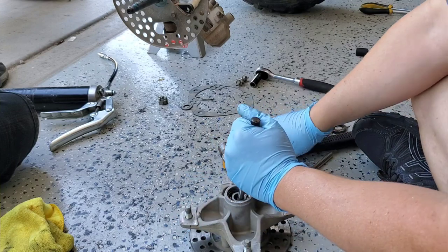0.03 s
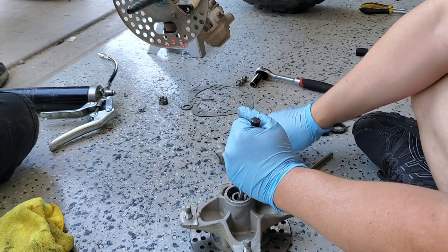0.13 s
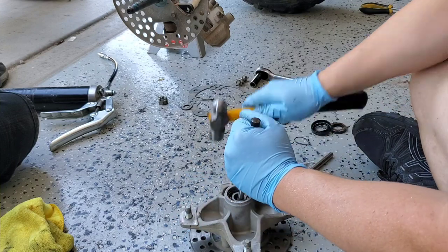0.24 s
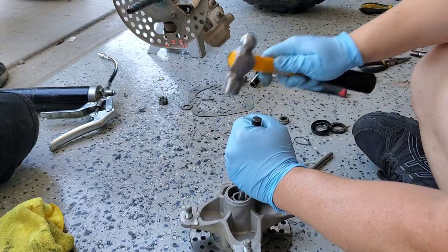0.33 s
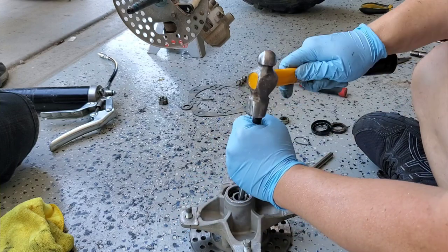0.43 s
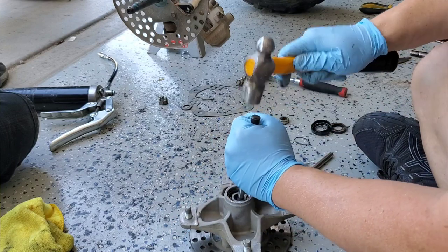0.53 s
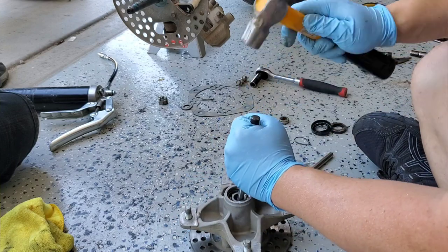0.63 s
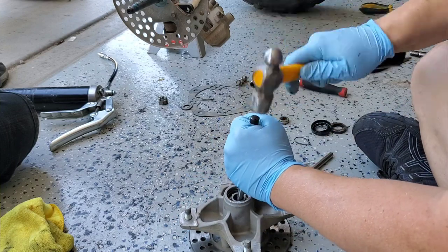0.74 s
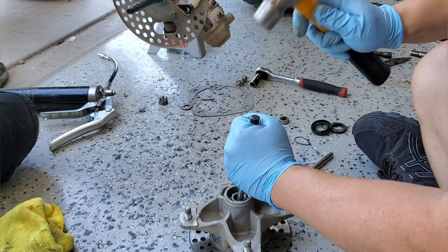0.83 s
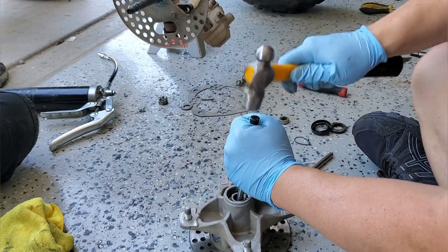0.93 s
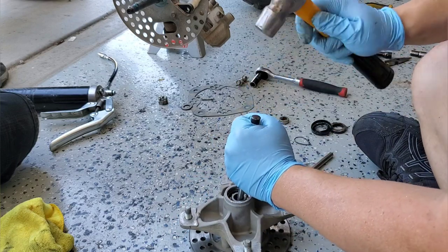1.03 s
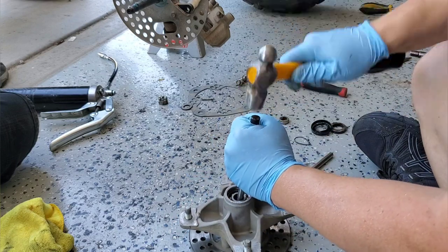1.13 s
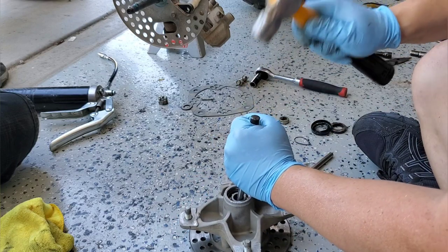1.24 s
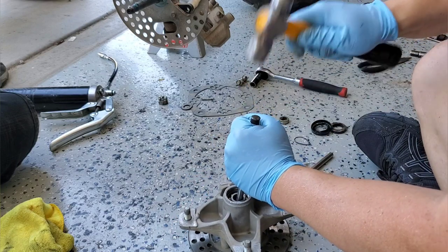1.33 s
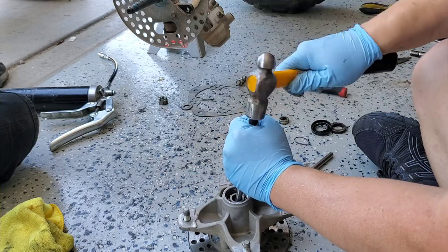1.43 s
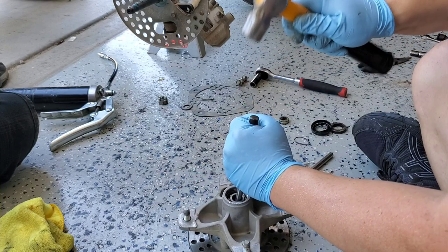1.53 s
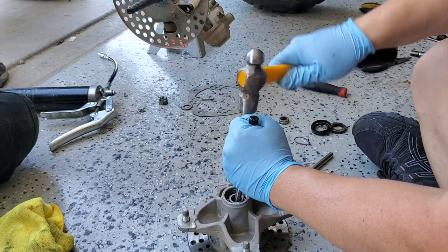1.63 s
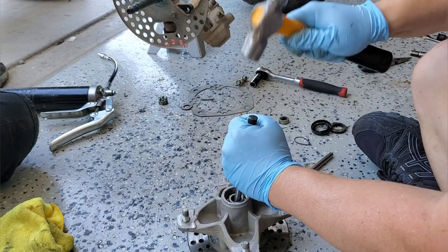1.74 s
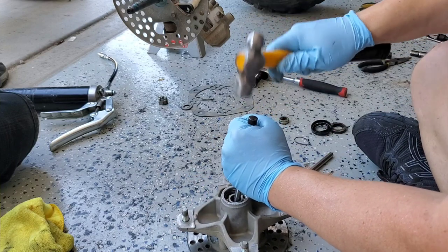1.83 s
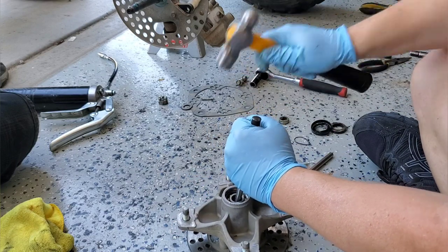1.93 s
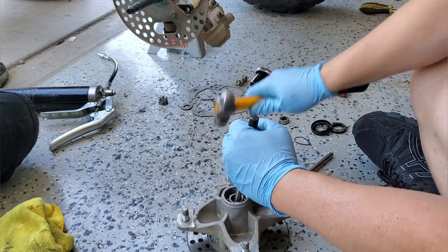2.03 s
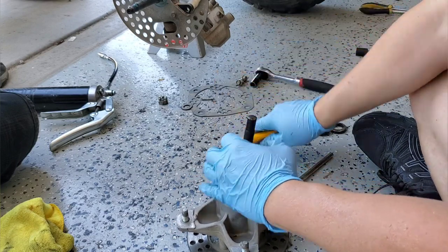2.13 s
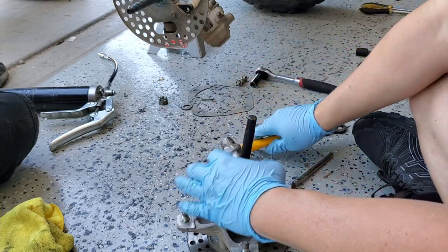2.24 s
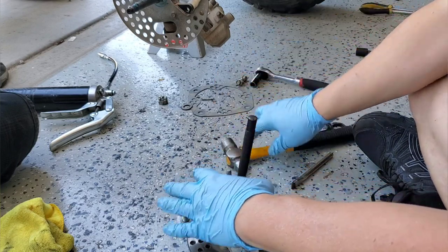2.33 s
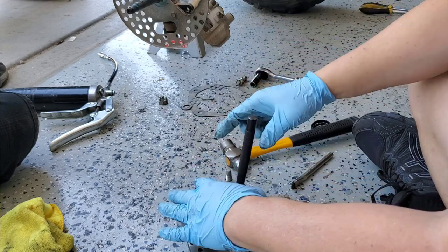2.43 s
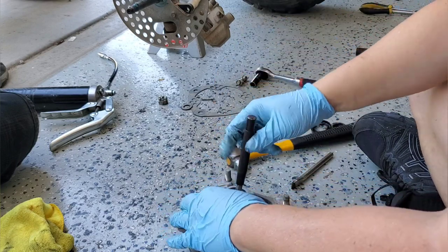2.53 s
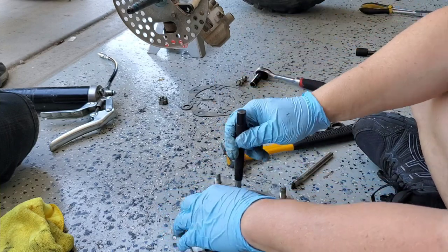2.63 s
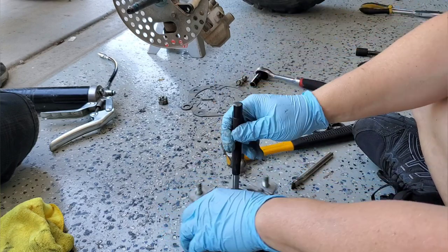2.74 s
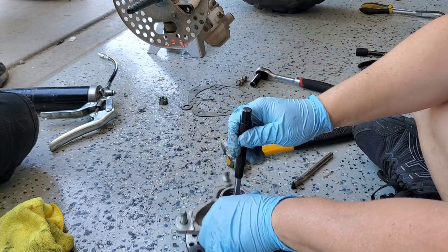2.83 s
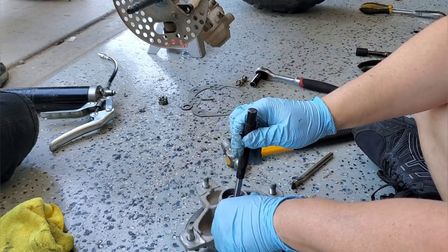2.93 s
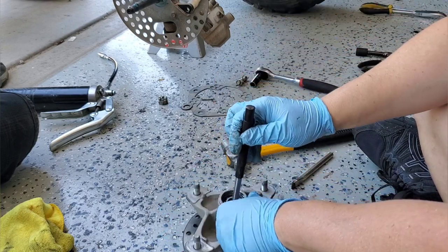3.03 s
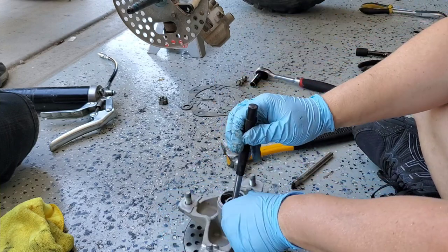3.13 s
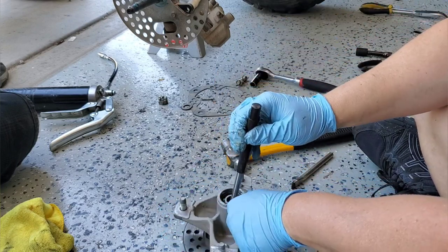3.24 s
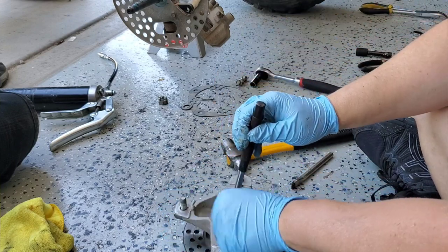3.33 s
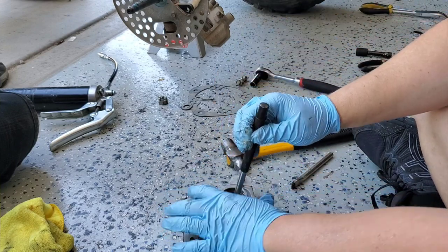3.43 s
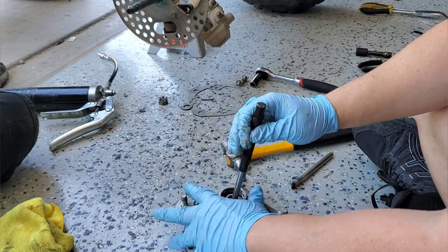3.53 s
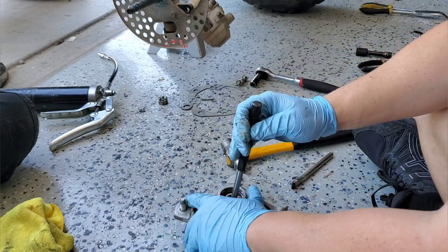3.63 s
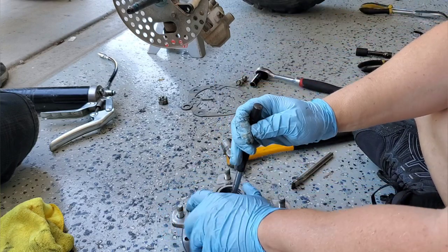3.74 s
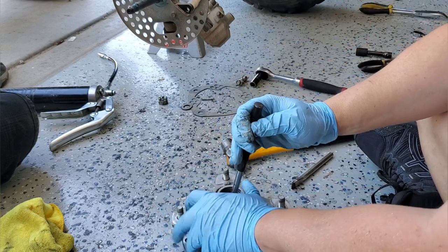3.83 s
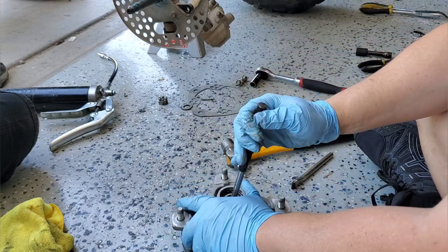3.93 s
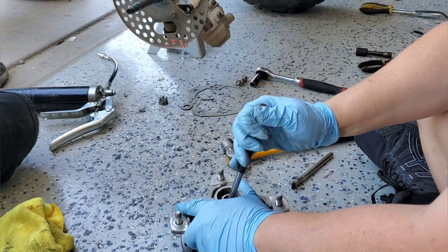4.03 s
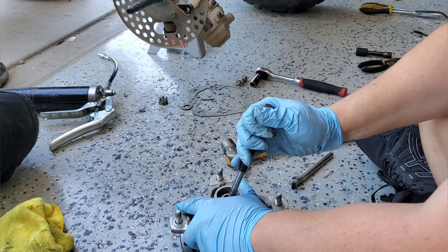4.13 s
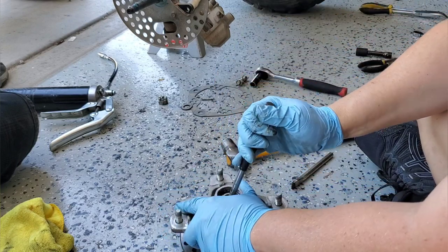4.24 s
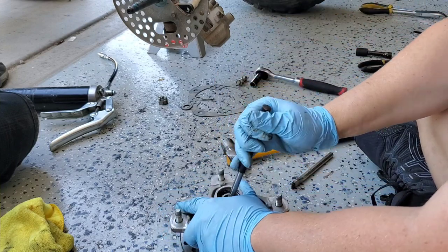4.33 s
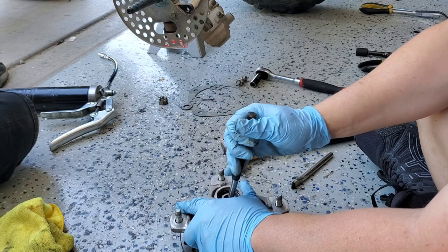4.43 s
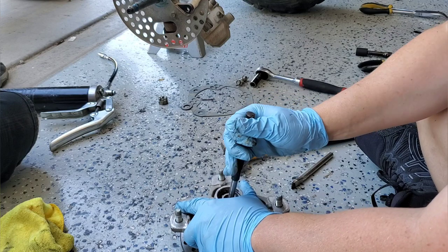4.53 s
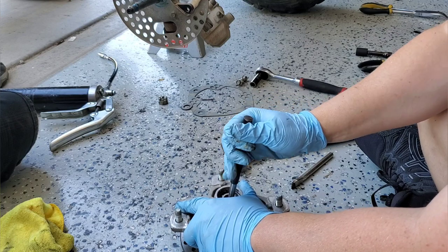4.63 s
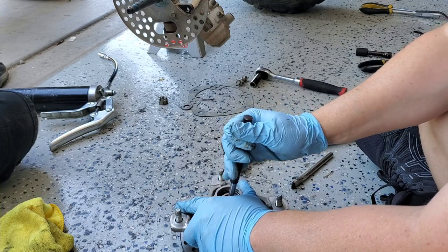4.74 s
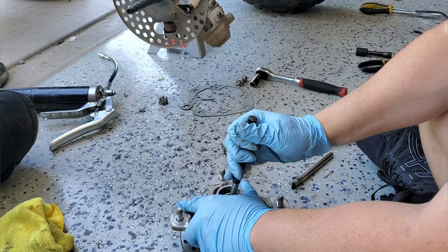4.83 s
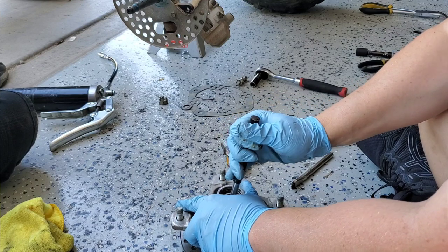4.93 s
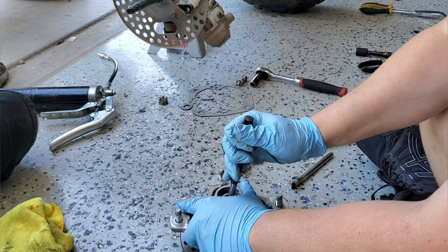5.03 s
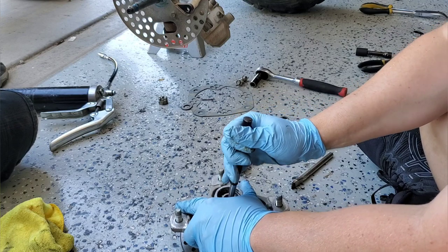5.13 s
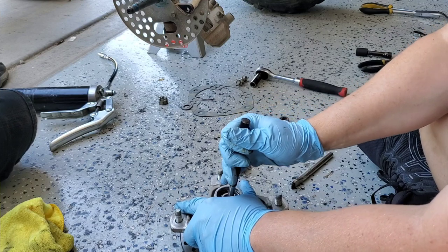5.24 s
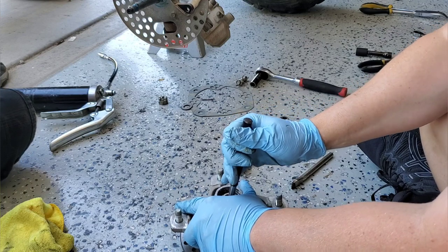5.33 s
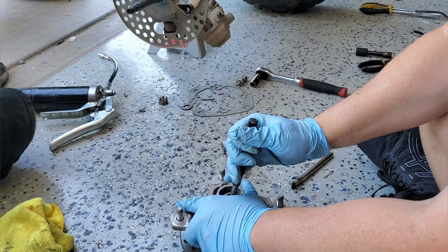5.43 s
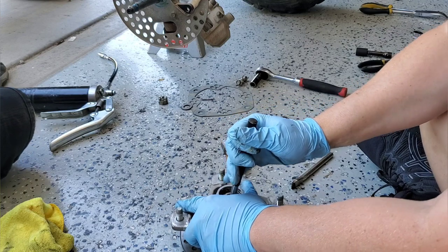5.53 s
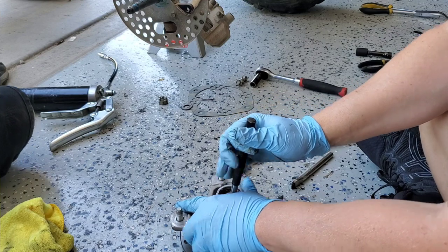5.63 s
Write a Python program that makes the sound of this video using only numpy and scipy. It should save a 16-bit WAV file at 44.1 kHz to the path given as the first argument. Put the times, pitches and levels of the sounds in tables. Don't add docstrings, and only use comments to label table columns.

```python
import sys
import numpy as np
from scipy import signal
from scipy.fft import rfft, irfft, next_fast_len
from scipy.io import wavfile
from scipy.ndimage import uniform_filter1d

SR = 44100
rng = np.random.default_rng(int(sys.argv[2]) if len(sys.argv) > 2 else 0)


def magnitude_from_level(level_db):
    exponent = np.asarray(level_db, float) / 20
    return 10 ** exponent


def wrap_up_sound(samples):
    columns = np.atleast_2d(samples).T
    tamed = np.clip(columns, -1, 1)
    steps = np.round(tamed * 32767).astype(np.int16)
    wavfile.write(sys.argv[1], SR, steps)


N = 251370

# [t/s, clank level/dB, hammer head ring/dB, hub middle ring/dB, hub high ring/dB]
BLOWS = [(0.5001, -12, -28, -27, -32), (0.7326, -4, -26.5, -20, -26.5), (0.9284, -8.5, -32, -29, -25.5),
         (1.1097, -12.5, -25.5, -29, -21.5), (1.2896, -9.5, -29, -29.5, -24.5), (1.4657, -9, -28, -32, -24),
         (1.644, -11.5, -20.5, -33.5, -26.5), (1.825, -10, -33, -32.5, -27)]
# [t/s, contact level/dB, low ring/dB, middle ring/dB, high ring/dB]
TOUCHES = [
    (2.715, -38, -49, -67, -67),
    (2.891, -43.5, -72, -63, -82),
    (3.092, -65, -48, -60.5, -72),
    (3.236, -47, -56, -59, -76),
    (3.975, -50, -74.5, -76, -63),
    (4.071, -8.5, -40.5, -41, -50),
    (4.4, -46, -70, -50.5, -71),
    (4.440, -33, -69, -56.5, -59.5),
    (5.196, -14.5, -59, -61.5, -45),
]
# [t/s, level/dB]
FINAL_KNOCK = [(5.1965, 3)]
# [f/Hz, width/Hz, level/dB]
GRATING_BODY = [(1144, 90, 4), (1750, 970, -2), (2907, 220, -7.5), (3842, 250, -5), (4480, 320, -7.5),
                (5920, 1400, -4), (8100, 860, -8), (11900, 2000, -10)]


def at_hz(points, hz):
    points_hz, values = np.transpose(points)
    return np.interp(np.log(hz), np.log(points_hz), values)


def rms_one(x):
    return x / np.sqrt(np.mean(x ** 2) + 1e-20)


def drift(rate):
    points = rng.standard_normal(400)
    return np.interp(np.arange(N) / SR * rate, np.arange(len(points)), points)


def stereo_band(white, low, high, likeness):
    band = signal.butter(2, [low, high], "band", fs=SR, output="sos")
    mid, side = signal.sosfilt(band, white)
    alike = np.clip(at_hz(likeness, np.sqrt(low * high)), 0, 1)
    return np.sqrt(1 + alike) * mid + np.sqrt(1 - alike) * side * [[1], [-1]]


def banded_noise(spectrum, low_hz, patchy_db, rate):
    # [f/Hz, likeness]
    likeness = [(60, .92), (240, 0.88), (950, 0.69), (3770, 0.16), (15000, 0.058)]
    out, together = 0, drift(rate)
    white = rng.standard_normal((2, 2, N))
    edges = low_hz * 2 ** np.arange(0, 6.1, .5)
    for k, (low, high) in enumerate(zip(edges, edges[1:])):
        flicker = patchy_db * (together + 0.57 * drift(rate))
        gain = magnitude_from_level(at_hz(spectrum, np.sqrt(low * high)) + flicker)
        out = out + gain * stereo_band(white[k % 2], low, high, likeness)
    return rms_one(out)


def strokes(rows, rise_db_s, fall_db_s):
    t = np.arange(0, N + 64, 32) / SR
    s, length, db = np.transpose(rows)[:, :, None]
    rise = rise_db_s * np.maximum(s - t, 0)
    fall = fall_db_s * np.maximum(t - s - length, 0)
    return np.interp(np.arange(N) / SR, t, magnitude_from_level(db - rise - fall).sum(axis=0))


def body(force, resonances):
    out = 0
    for k, (hz, width, db) in enumerate(resonances):
        r = np.exp(-np.pi * width / SR)
        gain = magnitude_from_level(db) * (-1) ** k * np.sqrt(1 - r * r)
        poles = [1, -2 * r * np.cos(2 * np.pi * hz / SR), r * r]
        out = out + signal.lfilter([gain, 0, -gain], poles, force + 1e-18)
    return out


def contacts(events, fade_s, click):
    force, t = np.zeros(N), np.arange(1300) / SR
    ragged = rng.standard_normal((len(events), len(t)))
    for (s, db, *_), rag in zip(events, ragged):
        burst = rag * np.exp(-t / fade_s) / np.sqrt(fade_s * SR)
        force[round(s * SR):][:len(t)] += magnitude_from_level(db) * (burst + click * (t == 0))
    return force


def rings(times, levels_db, modes, carry_db, scatter_db):
    contact_s = 0.0016
    out, (hz, db, t60) = np.zeros((2, N)), np.transpose(modes)
    luck = rng.standard_normal((len(times), 2, len(hz)))
    turn = rng.uniform(-.2, .9, len(hz))
    pole = (2j * np.pi * hz - np.log(1000) / t60) / SR
    starts = [round(s * SR) for s in times] + [N]
    height = np.zeros(len(hz))
    for k, (start, end) in enumerate(zip(starts, starts[1:])):
        struck = magnitude_from_level(levels_db[k] + db + scatter_db * luck[k, 0])
        height = np.hypot(height * magnitude_from_level(carry_db), struck)
        sides = height * np.exp(1j * (3 * luck[k, 1] + np.outer([1, -1], turn)))
        since = np.arange(end - start)
        swing = np.exp(np.outer(pole, since).astype(np.complex64))
        out[:, start:end] = (sides @ swing).imag * np.minimum(since / (contact_s * SR), 1)
        height = height * np.exp(pole.real * (end - start))
    return out


def slow_gain():
    before_db, after_db = -52.5, -52
    step_db, lag_s, hold_s, recover_s = 1.35, 0.22, 0.93, 0.86
    knock_duck_db = 2.5
    s = [row[0] + lag_s for row in BLOWS]
    db = before_db - step_db * np.arange(len(s) + 1)
    back = s[-1] + hold_s
    times = [s[0] - .05, *s, back, back + recover_s, FINAL_KNOCK[0][0], N / SR]
    levels = [*db, db[-1], after_db, after_db, after_db - knock_duck_db]
    return magnitude_from_level(np.interp(np.arange(N) / SR, times, levels))


def rumble():
    # [f/Hz, level/dB per Hz]
    colour = [(12, -44), (20, -25), (65, 1.5), (123, -8), (163, -10), (204, -13), (398, -25.5),
              (458, -24.5), (561, -25.5), (948, -31), (1160, -50), (2040, -31.5), (2500, -40), (3250, -70),
              (5500, -120)]
    hum = banded_noise(colour, 25, patchy_db=0.9, rate=5.8)
    return slow_gain() * hum * magnitude_from_level([[.7], [-.7]])


def rustle():
    # [t/s, length/s, level/dB]
    moves = [(.01, 0.044, -70), (.1, .23, -71.5), (.157, 0.011, -80), (1.95, 0.035, -61.5),
             (2.07, 0.087, -74), (2.97, .09, -76), (3.415, 0.018, -68), (3.49, .06, -70),
             (3.6, 0.015, -64.5), (3.655, 0.067, -69), (3.705, 0.047, -61.5), (3.8, 0.019, -64.5),
             (3.875, .09, -60.5), (3.98, 0.048, -72), (5.635, .03, -72), (5.665, .05, -67.5)]
    # [f/Hz, level/dB per Hz]
    colour = [(290, -38.5), (500, -11), (1140, -9.5), (1420, -2), (1590, -9.5), (3830, -6), (7560, -8.5),
              (12900, -9.5), (15800, -17)]
    hiss_db = -75.5
    hands = magnitude_from_level(8.0) * strokes(moves, rise_db_s=449.5, fall_db_s=325) + magnitude_from_level(hiss_db)
    return hands * banded_noise(colour, 340, patchy_db=4.0, rate=15.0)


def drags():
    # [t/s, length/s, level/dB]
    shifts = [
        (3.64, 0.13, -65.5),
        (4.1, 0.061, -56),
        (4.3, 0.19, -60),
    ]
    # [f/Hz, width/Hz, level/dB]
    colour = [(410, 180, -0.5), (800, 130, 0), (1327, 380, -6)]
    grit = rng.laplace(size=(2, N))
    grind = rms_one(body(grit[0] + 0.9 * grit, colour))
    return grind * strokes(shifts, rise_db_s=252, fall_db_s=120)


def tools_laid_down():
    # [t/s, level/dB]
    landings = [(2.178, -16), (2.268, -35), (2.307, -19.5), (2.319, -52), (2.369, -23), (2.38, -41),
                (2.4, -44), (2.425, -51), (2.554, -45), (3.5, -54), (3.771, -35.5), (4.188, -55)]
    # [f/Hz, width/Hz, level/dB]
    handle = [(350, 230, -15), (1540, 1370, 1.5), (2270, 1420, 4.5), (3450, 530, 0), (5400, 1200, -8),
              (12000, 4500, -14)]
    return magnitude_from_level(7.0) * body(contacts(landings, fade_s=0.0038, click=0.32), handle)


def scrapes():
    # [t/s, length/s, level/dB]
    grates = [(.46, 0.017, -62.5), (3.09, 0.057, -61), (3.16, 0.13, -64.5), (3.64, 0.12, -62.5),
              (4.056, 0.014, -54), (4.345, 0.027, -55), (4.385, 0.028, -53.5), (4.4, 0.0044, -37),
              (4.43, 0.021, -45), (4.613, 0.017, -51.5), (4.66, 0.032, -68), (4.9, .03, -70.5),
              (5.177, 0.026, -46.5), (5.693, .02, -60)]
    sizes = magnitude_from_level(4.1 * np.minimum(rng.exponential(1, N), 5)) * rng.choice([-1, 1], N)
    catches = sizes * (rng.random(N) < 2500 / SR)
    grains = rms_one(body(catches, GRATING_BODY))
    return grains * strokes(grates, rise_db_s=1799.5, fall_db_s=796.5)


def loose_punch():
    # [t/s, level/dB, lowest mode level/dB]
    tinkles = [(2.6663, -44, 3), (2.7152, -27.5, -3), (2.7796, -44, 5.5), (2.8656, -51, 0),
               (2.8738, -40.5, -3), (2.9118, -37, 1.5), (3.0794, -43.5, -13), (3.0962, -41, -12.5),
               (3.1125, -35.5, -6), (3.188, -41, -9), (3.235, -26.5, -15), (3.248, -46, 5)]
    # [f/Hz, level/dB, t60/s]
    modes = [(1077, -9.5, 0.58), (2693, -17, 0.33), (3550, -3.5, 0.053), (3917, -3, 0.051),
             (4985, -21, 0.074), (6540, -6, 0.052), (7160, -8.5, 0.069), (8540, -17.5, 0.15),
             (10860, -18.5, 0.14), (11560, -22, 0.11)]
    s, db, low_db = np.transpose(tinkles)
    lowest = np.arange(len(modes)) == 0
    levels = db[:, None] - 11.5 + np.outer(low_db, lowest)
    return rings(s, levels, modes, carry_db=-14.0, scatter_db=5.0)


def touches():
    return magnitude_from_level(4.0) * body(contacts(TOUCHES, fade_s=0.0051, click=0.58), GRATING_BODY)


def hollow_knock():
    # [f/Hz, width/Hz, level/dB]
    hollow = [(396, 100, -22), (1132, 24, 0), (1228, 45, 1), (1726, 260, -2), (1896, 350, -10),
              (3710, 100, -21)]
    return magnitude_from_level(8.5) * body(contacts(FINAL_KNOCK, fade_s=0.000083, click=0.61), hollow)


def thuds():
    # [f/Hz, width/Hz, level/dB]
    concrete = [(200, 120, -6), (330, 200, -1), (680, 300, -3)]
    force = np.zeros(N)
    force[[round(row[0] * SR) for row in BLOWS]] = magnitude_from_level(-22)
    return body(force, concrete)


def clanks():
    # [f/Hz, width/Hz, level/dB]
    clank = [(455, 330, -20), (1070, 31, -5.5), (1410, 340, -1.5), (1838, 190, 2.5), (2345, 460, -2.5),
             (3835, 110, 0), (5300, 1500, -5), (9140, 4300, -4), (12050, 1500, -1), (15700, 1000, -10)]
    return magnitude_from_level(13.0) * body(contacts(BLOWS, fade_s=0.0027, click=0.6), clank)


def hammer_head():
    # [t/s, level/dB]
    damped = [
        (2.176, -49),
        (2.311, -61),
        (2.370, -62.5),
    ]
    s, db = np.transpose([(row[0], row[2]) for row in BLOWS] + damped)
    note = [(2594, 0, 1.68)]   # f/Hz, level/dB, t60/s
    return rings(s, db, note, carry_db=-25, scatter_db=0)


def steel():
    modes_hz = [760, 925, 1758, 3769, 3867, 4015, 5292, 5469, 5642, 5662, 5737, 6325, 7165, 7559, 8410,
                8759, 9238, 9384, 9668, 9781, 10107, 11620, 11875, 12185, 12367, 13097, 13810, 14210, 14840,
                15620]
    # [level/dB, t60/s]
    modes_ring = [(-40.5, 1.0), (-36, 1.1), (-23, 3.0), (-5.5, .3), (-10.5, .12), (-22.5, 2.7), (-23, 0.79),
                  (-13.5, 0.22), (0.5, 0.23), (-14.5, 1.5), (-9, 0.61), (-25, 0.26), (-17, 0.32),
                  (-15.5, 0.6), (-16, 0.27), (-7.5, 0.21), (-4, 0.16), (-2, 0.1), (-13.5, 0.17), (-6, .17),
                  (-9.5, 0.23), (-15, 0.16), (-12.5, 0.26), (-1.5, 0.16), (-4, 0.18), (-9.5, .18),
                  (-17, 0.42), (-24.5, .45), (-12, 0.23), (-17.5, 0.12)]
    low_db, middle_from_hz, high_from_hz = -31.5, 5000, 8000
    blows = [(s, low_db, middle, high) for s, _, _, middle, high in BLOWS]
    later = [(s, low, middle, high) for s, _, low, middle, high in TOUCHES]
    hits, hz = np.array(blows + later), np.array(modes_hz)
    group = 1 + (hz > middle_from_hz).astype(int) + (hz > high_from_hz)
    modes = np.column_stack([hz, modes_ring])
    return rings(hits[:, 0], hits[:, group], modes, carry_db=-4.5, scatter_db=3.0)


def garage(hits, ringing, tail_db, ringing_wet_db):
    # [f/Hz, t60/s]
    decay = [(200, 0.45), (500, 0.33), (1200, 0.31), (3000, 0.27), (8000, 0.23), (15000, 0.17)]
    # [f/Hz, likeness]
    likeness = [(250, 1), (600, 0.67), (2000, 0.44), (8000, 1)]
    # [delay/s, level/dB]
    echoes = [(0.0117, -5), (0.0153, -15), (.0245, -15)]
    # [f/Hz, level/dB]
    left_db = [(60, -0.5), (150, -0.5), (380, 2.5), (950, 5.5), (2380, 7), (5980, 12), (15000, 2.5)]
    size, t = next_fast_len(N + SR // 2), np.arange(SR // 2) / SR
    hz = np.maximum(np.arange(size // 2 + 1) * SR / size, 1)
    white, tail = rng.standard_normal((2, len(t))), 0
    edges = np.geomspace(100, 19000, num=12)
    for low, high in zip(edges, edges[1:]):
        fade = magnitude_from_level(-60 * t / at_hz(decay, np.sqrt(low * high)))
        tail = tail + stereo_band(white, low, high, likeness) * fade
    walls = rfft(magnitude_from_level(tail_db) * tail * np.clip(t / 0.0019, 0, 1), size)
    for delay, db in echoes:
        side_delay = delay + np.array([[.0002], [-.0002]])
        walls = walls + magnitude_from_level(db) * np.exp(-2j * np.pi * hz * side_delay)
    lean = magnitude_from_level(at_hz(left_db, hz) * np.array([[.3], [-.7]]))
    heard = rfft(hits, size) * (1 + walls)
    heard = heard + rfft(ringing, size) * (1 + magnitude_from_level(ringing_wet_db) * walls)
    return irfft(heard * lean, size)[:, :N]


def scene():
    hits = clanks() + thuds() + touches() + tools_laid_down() + scrapes()
    ringing = magnitude_from_level(5.0) * steel() + hammer_head() + loose_punch() + hollow_knock()
    near = garage(hits, ringing, tail_db=-26.0, ringing_wet_db=-5.5)
    return near + rustle() + drags() + rumble()


def limiter(x, top_db, release_db_s, ahead_s):
    over = np.maximum(20 * np.log10(np.abs(x).max(axis=0) + 1e-9) - top_db, 0)
    climb = release_db_s * np.arange(N) / SR
    held = np.maximum.accumulate(over + climb) - climb
    lead = int(ahead_s * SR)
    early = np.interp(np.arange(N) + lead, np.arange(N), held)
    return x * magnitude_from_level(-uniform_filter1d(np.maximum(early, held), size=lead))


def roll_off(x):
    return signal.sosfilt(signal.butter(12, 16960, fs=SR, output="sos"), x)


def record(dry):
    level = limiter(dry, top_db=-4, release_db_s=499, ahead_s=0.0095)
    top_cut = signal.cheby2(12, 50, 16150, fs=SR, output="sos")
    mix = signal.sosfilt(top_cut, level)
    return roll_off(mix)


dry = scene()
out = record(dry)
wrap_up_sound(out)
```